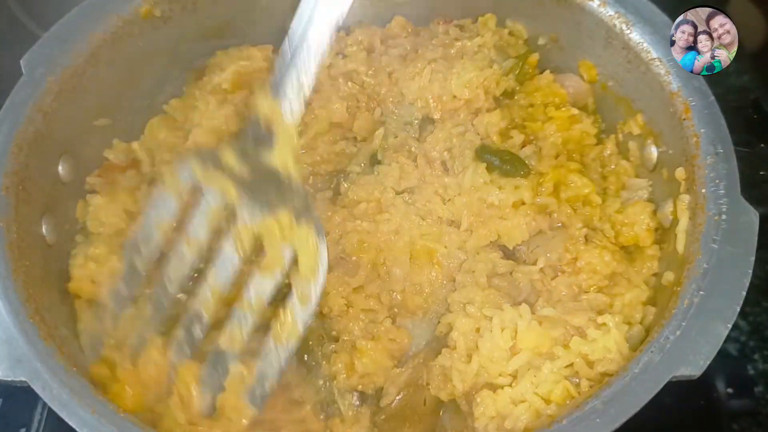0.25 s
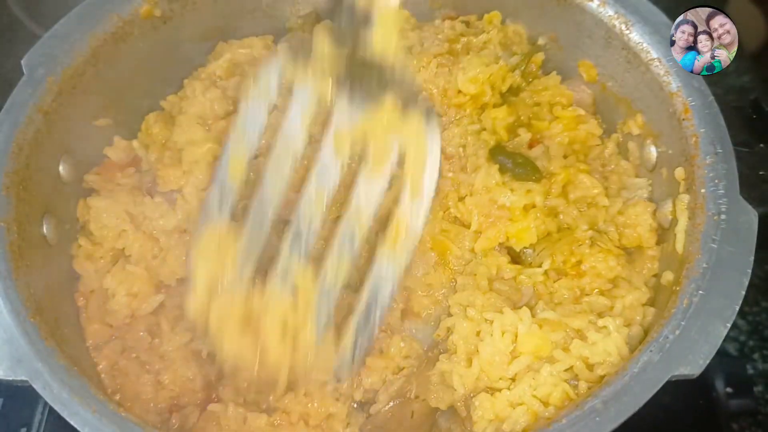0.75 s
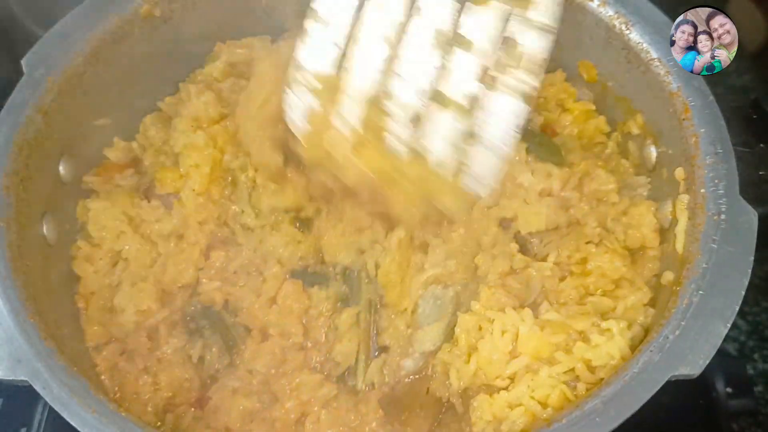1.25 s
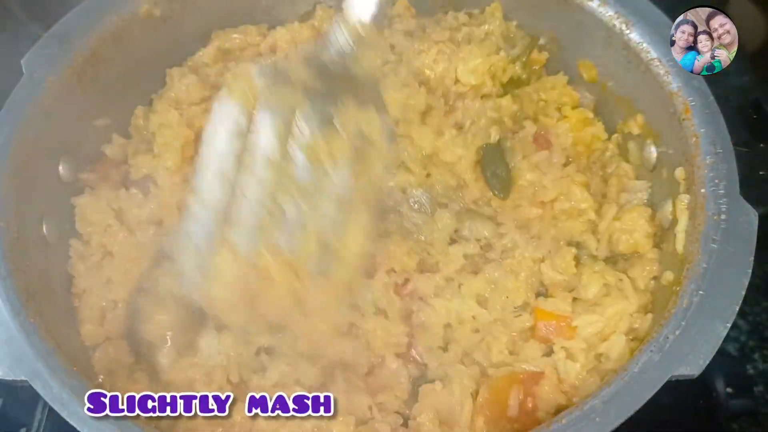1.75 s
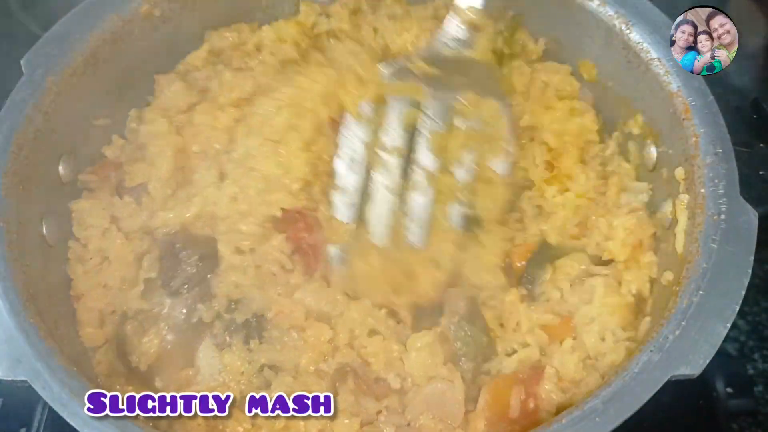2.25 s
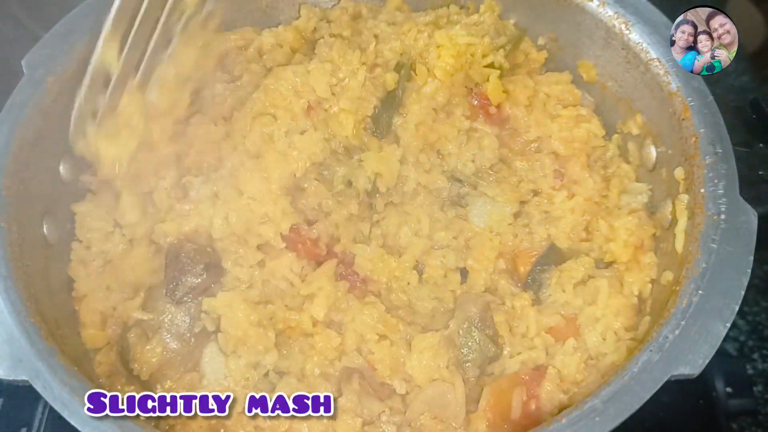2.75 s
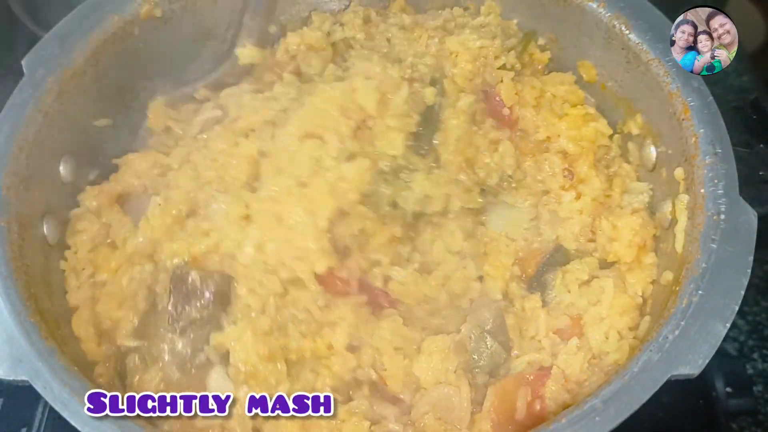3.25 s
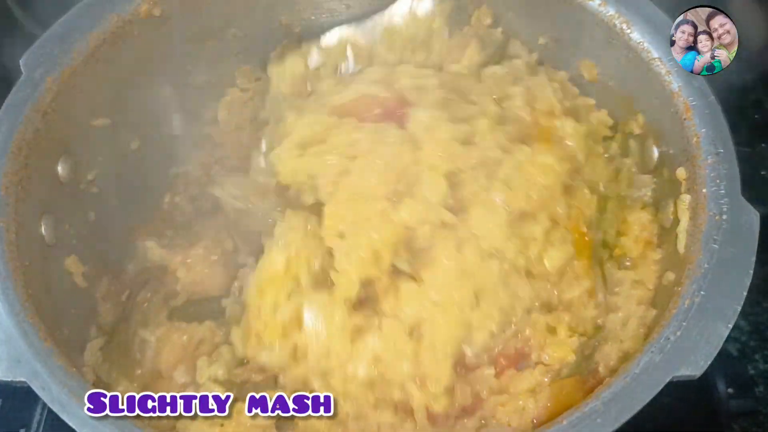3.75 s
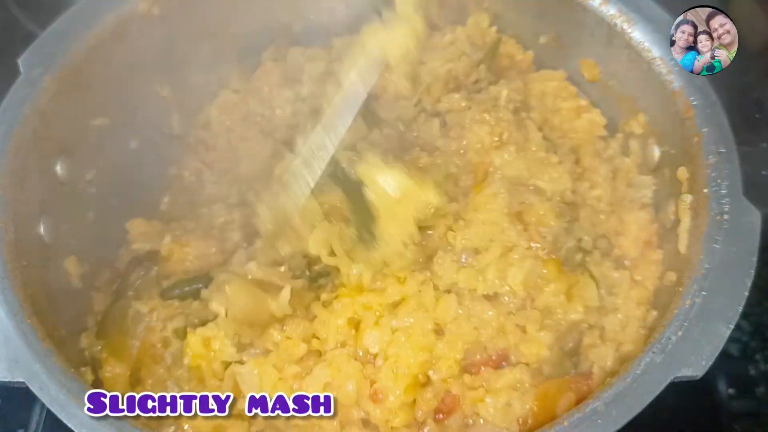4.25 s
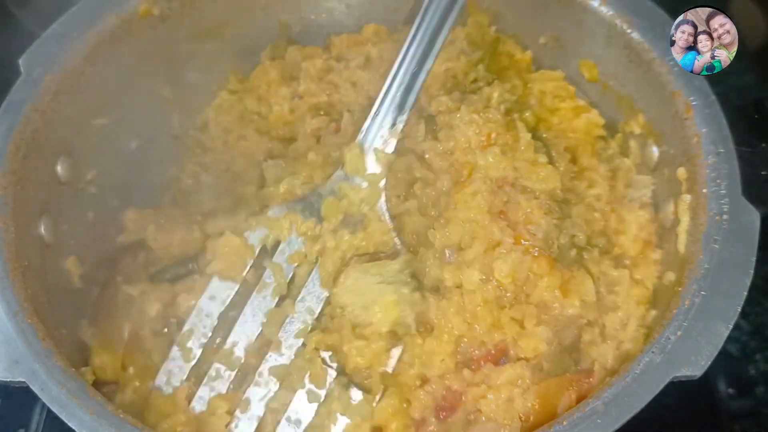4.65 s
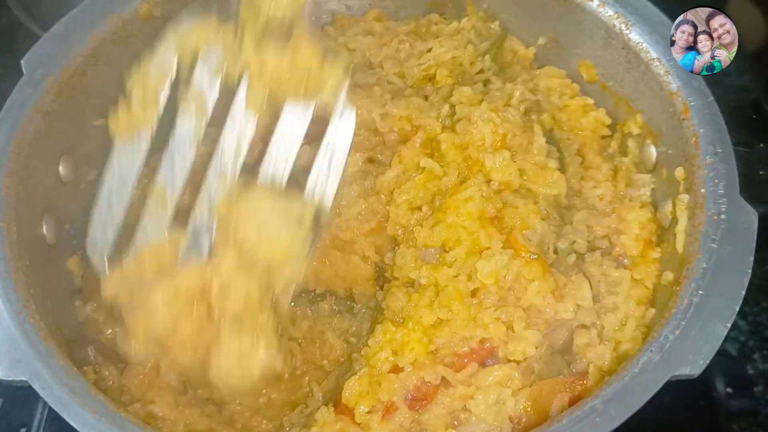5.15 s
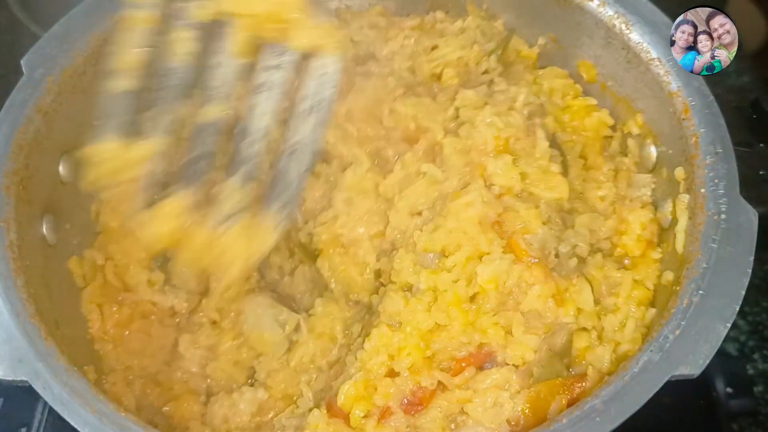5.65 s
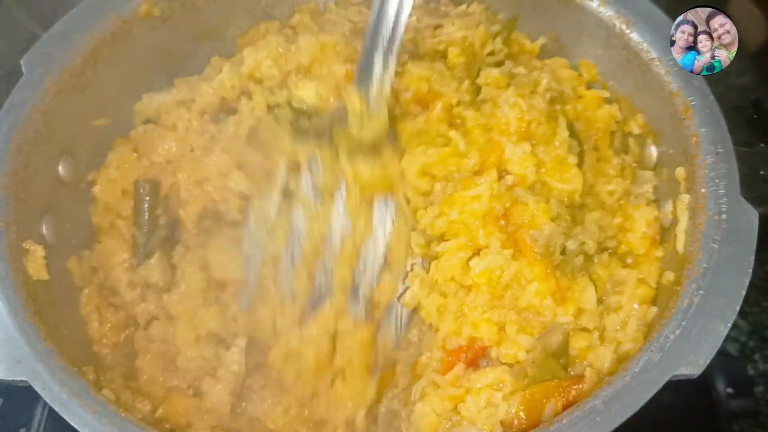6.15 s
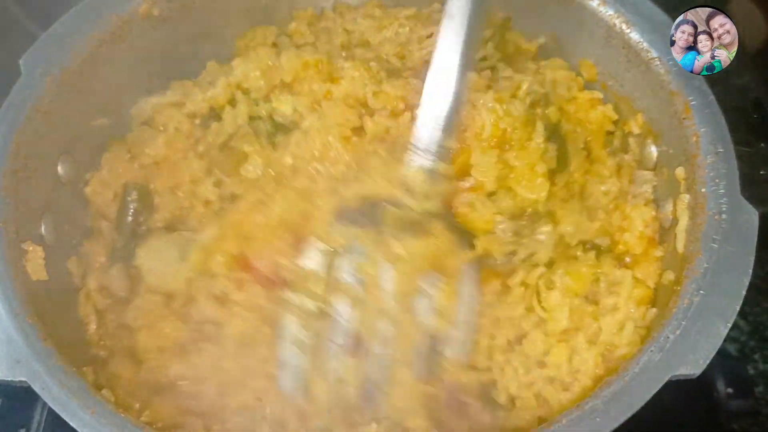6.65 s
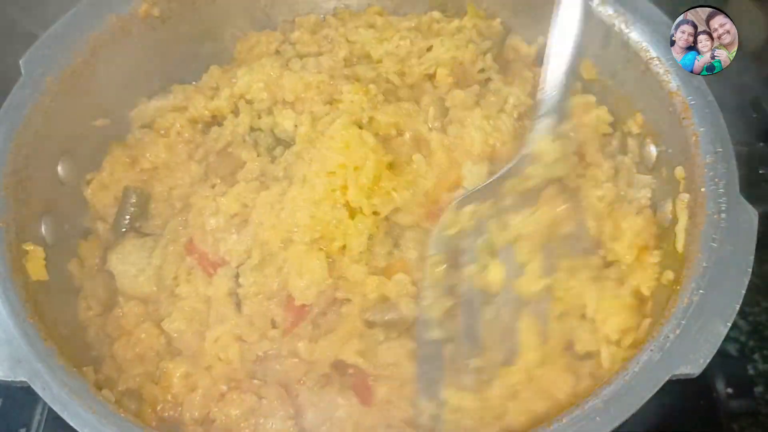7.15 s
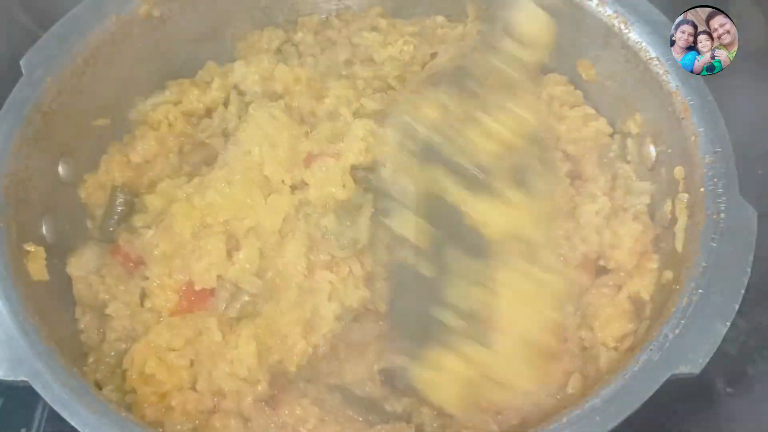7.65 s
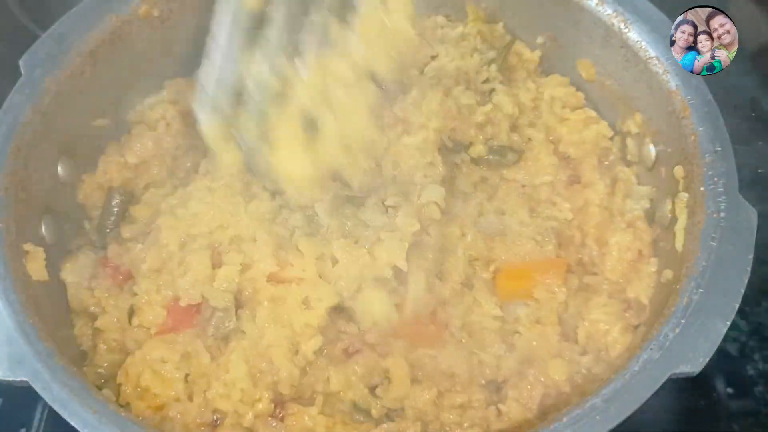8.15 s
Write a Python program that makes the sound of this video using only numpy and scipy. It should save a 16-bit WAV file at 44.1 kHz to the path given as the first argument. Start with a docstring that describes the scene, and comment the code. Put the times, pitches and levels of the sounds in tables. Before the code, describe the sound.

Close, moist crackles and tiny sticky pops as soft rice is mashed, broken by ringing metal knocks and a short juddering scrape on the pot.

```python
"""A hard-walled kitchen: a slotted steel turner mashes soft, wet rice in an aluminium pressure cooker, close by.
Each stroke crackles as sticky films part, made of random clicks, with decaying tones for bubbles.
The blade's knocks are noise bursts plus the pot's ringing modes; its scrape is uneven slips and grit.
Squeaks and short rings are gliding tones. A wavering low hum, low pot resonances, a deep rumble and
a faint hiss are filtered noise."""
import sys
import numpy as np
from scipy import signal
from scipy.fft import rfft, irfft, next_fast_len
from scipy.io import wavfile
from scipy.ndimage import uniform_filter1d, map_coordinates

SR = 44100
rng = np.random.default_rng(int(sys.argv[2]) if len(sys.argv) > 2 else 0)


def dump(signal):
    """Clip the signal to [-1, 1] and save it as 16-bit WAV at the path in sys.argv[1]."""
    limited = np.clip(np.atleast_2d(signal).T, -1, 1)
    pcm = np.round(limited * 32767).astype(np.int16)
    wavfile.write(sys.argv[1], SR, pcm)


N = 370572

# Table levels are starting points: the functions add their own gains.
# Pushes of the blade through the rice: start_s, length_s, crackle_db, squelch_db, thud_db
STROKES = [(0.415, .1, -56.5, -60, -63), (0.556, 0.065, -62, -67, -72.5), (0.825, 0.15, -68, -79.5, -82),
           (0.983, 0.081, -62, -67, -77), (1.1, 0.053, -58, -71, -73), (1.37, 0.091, -72.5, -71, -92),
           (1.46, .08, -68, -74, -88), (1.528, .15, -59, -61, -65.5), (1.715, 0.033, -59, -57, -61.5),
           (1.787, 0.065, -54, -60.5, -60.5), (2.088, 0.12, -60, -62.5, -72),
           (2.256, 0.21, -62, -67.5, -68), (2.596, 0.22, -86.5, -97.5, -89),
           (3.453, 0.12, -57.5, -64, -56.5), (3.597, 0.14, -62.5, -67, -78),
           (3.829, 0.073, -58.5, -63.5, -62.5), (3.935, 0.083, -67, -75, -73),
           (4.208, 0.054, -63.5, -66.5, -65), (4.677, .13, -55.5, -60, -71),
           (4.872, .08, -52, -59.5, -63.5), (5.02, 0.2, -74, -70.5, -69), (5.297, 0.051, -52, -66, -81),
           (5.407, 0.17, -63.5, -70.5, -70.5), (5.949, 0.11, -57.5, -63, -61),
           (6.132, 0.086, -56, -75.5, -70), (6.413, 0.11, -62.5, -66, -63),
           (6.549, 0.12, -56.5, -60, -58.5), (6.744, 0.059, -53, -66, -62), (7.069, .16, -63, -68.5, -65.5),
           (7.304, 0.1, -57.5, -71, -68), (7.419, 0.086, -64, -73, -65.5), (7.717, .19, -66, -70, -65),
           (7.918, 0.089, -55.5, -63.5, -59.5), (8.348, .05, -65, -74, -64)]
# The mash settling between pushes: crackle_db, squelch_db, thud_db
RESTING_DB = (-86, -81.5, -71.5)
# Tone colour of the wet rice: freq_hz, level_db (per Hz)
WET_COLOUR = [(88, -31.5), (150, -4.5), (205, -1.5), (240, -10.5), (328, -2), (368, -10.5), (589, -11),
              (649, -13.5), (1690, -17.5), (3040, -11.5), (5910, -13), (7620, -4.5), (11700, -17.5),
              (14800, -11.5), (16000, -17.5)]
# Larger wet films snapping: start_s, level_db, pitch_hz
FILM_POPS = [(0.554, -37.5, 7940), (.5904, -43, 7800), (0.6077, -37, 6000), (0.6134, -32.5, 7600),
             (0.9416, -40.5, 7900), (1.046, -38, 7600), (1.122, -41, 7600), (1.156, -37.5, 2500),
             (1.1726, -36, 7800), (1.3905, -42.5, 5450), (1.5215, -43.5, 7500), (1.536, -39, 3500),
             (1.5687, -32.5, 7600), (1.6557, -40.5, 7500), (1.7775, -36, 7900), (1.799, -38, 7500),
             (1.8204, -30.5, 7360), (1.8713, -33, 7500), (2.1128, -39.5, 3540), (2.1527, -40, 7640),
             (2.171, -40, 7600), (2.2048, -41, 7600), (2.359, -46, 7550), (2.5661, -42.5, 3420),
             (2.8192, -40.5, 7240), (3.4832, -28.5, 7650), (3.5147, -32.5, 5900), (3.557, -31.5, 11000),
             (3.619, -32, 9540), (3.6573, -37, 7600), (4.0915, -36.5, 7800), (4.2475, -39, 6000),
             (4.286, -46.5, 9000), (4.708, -29, 8070), (4.924, -33.5, 7500), (4.9457, -35, 9000),
             (4.9664, -28, 7670), (5.0128, -35.5, 7900), (5.164, -42, 3400), (5.194, -40, 1110),
             (5.3425, -26, 7800), (5.356, -25, 7500), (5.5523, -34, 7500), (5.64, -38.5, 2500),
             (5.823, -48, 7600), (5.9789, -43, 7600), (6.028, -44, 7600), (6.054, -37.5, 4230),
             (6.163, -37, 8500), (6.1926, -33.5, 7900), (6.5701, -38, 7650), (6.7058, -50, 7600),
             (6.7913, -40, 7700), (6.835, -34.5, 7700), (7.0883, -41, 6900), (7.1138, -40, 8040),
             (7.233, -50, 7600), (7.36, -35.5, 7850), (7.734, -45, 4530), (7.8144, -40, 6600),
             (7.9687, -41, 7500), (7.973, -58, 1810)]
# How far the mash is ahead on the left side: freq_hz, lead_radians
LEFT_LEAD = [(100, 0.04), (950, 1.4), (1800, 1.2), (3000, 1.2), (5800, 0.12)]
# Blade hitting pot: start_s, landing (a name), clank_db, body_db, treble_db, rattle_db, lowest_hz,
# pot_db, blade_hz, blade_db, left_over_right_db
POT_KNOCKS = [(0.1838, "edge", -20, -40, -24, -6, 150, -43, 3580, 4, 2),
              (.481, "tip", -49.5, -53.5, -61, -18, 405, -76, 3000, 0.5, 4),
              (2.883, "edge", -46, -66, -49.5, -9, 400, -70, 3760, 17.5, -4),
              (2.911, "edge", -48, -69.5, -42.5, -11, 400, -67, 3800, 5.5, -4),
              (3.052, "tip", -27.5, -30.5, -39, -16.5, 130, -59, 2280, 0, 0),
              (3.649, "flat", -47, -56.5, -47, -19.5, 204, -76, 2240, 7, -9.5),
              (4.592, "flat", -22.5, -36, -28, -7, 295, -44, 2080, 3.5, 0.5),
              (5.2506, "tip", -28, -42, -35, -9, 168, -45, 3460, 7.5, -1),
              (6.193, "tip", -46.5, -56.5, -49, -20, 500, -75, 2500, -6, -1),
              (6.807, "flat", -45, -49.5, -46, -24.5, 250, -69.5, 1400, -2.5, 1),
              (7.288, "tip", -44.5, -53, -55, -12.5, 484, -74, 3000, 11.5, -1)]
# Ways the blade can land: name
LANDING_NAMES = ["edge", "flat", "tip"]
# First instant of contact over the crack, one for each landing: level_db
LANDING_SNAP = [13, 6, 6]
# The pot's ringing modes and how each landing stirs them: pitch_hz, t60_s, edge_db, flat_db, tip_db
POT_MODES = [(308, .34, -16.5, -22, -7), (343, 0.21, -10.5, -1, -7.5), (391, 0.38, -5.5, -7, -10),
             (434, 0.5, -11.5, -3, -20), (511, .32, -12.5, -2, -0.5), (595, .33, -13, -1, -24),
             (643, .3, -13, -11, -17), (756, 0.28, -6.5, 3.5, -13), (810, .3, -10.5, -13, -5),
             (1010, 0.3, -17, -14, -0.5), (1093, .3, -6.5, -13, -16), (1428, 0.23, -16.5, 0, -9),
             (1590, 0.25, -5, -4, -21), (1770, 0.36, -6.5, -6, -21), (2040, 0.36, 0, -15, -25),
             (2280, 0.27, -4, 1, -17.5), (2545, .35, -0.5, -3, -12), (2850, 0.45, -0.5, -5, -18),
             (3125, .32, -0.5, -15, -12), (3400, 0.12, -4.5, -13.5, 2), (3736, .2, 2.5, -9.5, -15),
             (4080, 0.21, -5, -5, -16), (4640, .25, -0.5, 0, -4.5), (7330, .2, 2, -7, -13.5),
             (7900, .2, 2, -3, -13)]
# Tone colour of a knock: freq_hz, level_db (per Hz)
CLANK_COLOUR = [(120, -15.5), (200, -6), (330, -4), (500, -5.5), (800, -6), (1200, -8), (1500, -8),
                (1900, -4), (2400, -3), (3100, -4.5), (4500, -4), (5500, -4.5), (7700, -1), (9300, -9.5),
                (14400, -21.5), (16000, -25)]
# The blade pressed along the wall: time_s, judder_db, grit_db
SCRAPE_LEVEL = [(3.07, -37, -52), (3.11, -33.5, -38), (3.145, -36.5, -43.5), (3.245, -32.5, -37),
                (3.314, -31.5, -39), (3.388, -35.5, -38.5), (3.47, -52.5, -51.5)]
# Resonances of the pot wall: centre_hz, width_hz, level_db
WALL_MODES = [(509, 24, 6), (570, 59, 7), (650, 34, -2.5), (805, 59, 1.5), (990, 50, 1.5), (1146, 63, 2),
              (1320, 70, -9), (1650, 38, -11), (2150, 140, -19), (2600, 200, -5)]
# Tone colour of the grinding blade: freq_hz, level_db (per Hz)
GRIND_COLOUR = [(71, -48.5), (120, -16), (250, -20), (330, -12.5), (503, -6.5), (698, -7.5), (805, -4.5),
                (892, -10), (1200, -14.5), (1620, -9), (1850, -16.5), (2450, -13.5), (2990, -21),
                (5200, -21), (6500, -23), (7660, -17.5), (11100, -37), (14700, -30.5), (16000, -44)]
# The blade catching and jumping on the wall: start_s, level_db, ring_hz
BLADE_CATCHES = [(3.095, -33, 1027), (3.116, -28, 1000), (3.167, -34, 800), (3.189, -36.5, 830),
                 (3.209, -38, 806), (3.24, -33, 800), (3.267, -32, 806), (3.344, -42.5, 1140),
                 (3.389, -42.5, 650)]
# The edge skidding lightly on metal: start_s, length_s, level_db
EDGE_SKIDS = [(0.206, 0.025, -38.5), (2.881, 0.075, -44.5), (2.968, 0.055, -55.5), (5.199, 0.068, -50.5)]
# Tone colour of the skidding edge: freq_hz, level_db (per Hz)
EDGE_COLOUR = [(300, -10), (725, -13), (1500, -14), (2100, -7.5), (2900, -7), (3800, -2.5), (4500, -0.5),
               (5800, -10), (7500, -2), (9240, -10), (14200, -19), (16000, -25)]
# The edge catching into a tone; the rows near 335 Hz are the pot's hollow ring under strokes,
# and the row at 5.248 s is the blade's resonance ringing at a knock:
# start_s, length_s, first_hz, last_hz, level_db, roughness (no unit, 0 is smooth), side_tones_db
SQUEAKS_AND_RINGS = [(1.004, 0.19, 3150, 2970, -68, 1, -27), (1.205, 0.13, 2010, 2070, -73.5, 0.96, -22),
                     (1.446, 0.055, 2090, 2070, -73, 0.75, -17), (1.658, 0.22, 2030, 2070, -72, 0.63, -16),
                     (1.73, 0.13, 333, 332, -63, 0.27, -30), (2.17, 0.19, 344.5, 322.7, -62, 0.25, -30),
                     (3.096, 0.073, 1001, 1003, -37, 0.65, -22), (3.16, 0.11, 816, 790, -36, 0.7, -29),
                     (4.993, .04, 1896, 1794, -64, 1.43, -6), (5.038, 0.049, 1790, 1980, -66.5, 1.16, -9),
                     (5.078, 0.0089, 2050, 1950, -58, .4, -16), (5.103, 0.072, 1950, 2250, -67, 1.25, -6),
                     (5.188, .012, 4000, 4050, -53, 0.66, -23), (5.199, 0.028, 3660, 4000, -45, 0.3, -26),
                     (5.248, 0.0143, 3597, 3350, -37.5, 0.27, -26)]
# Quieter tones beside each squeak or ring: ratio (to the pitch, no unit), level_db
SIDE_TONE_RATIOS = [(0.459, -3), (1.498, 2.5), (2.0, -7)]
# Low hum: centre_hz, width_hz, level_db
HUM_BANDS = [(67.3, 1.4, -4.5), (92.4, 16, -9)]
# Wavering level of the low hum: time_s, level_db
HUM_LEVEL = [(0, -73), (.4, -63.5), (.75, -75.5), (1.75, -67.5), (2.1, -74.5), (3.3, -63), (4.3, -69.5),
             (5.4, -62), (5.8, -67.5), (6.4, -62.5), (7.1, -67.5), (8.4, -69)]
# Low resonances of the pot: centre_hz, width_hz, level_db
POT_LOW_BANDS = [(140.8, 7, 3.5), (205.5, 20, -8.5), (287.7, 9.6, -13.5), (337.3, 7.2, -12)]
# Wavering level of the pot's low resonances: time_s, level_db
POT_LOW_SWELL = [(0, -86.5), (.25, -59), (.8, -72.5), (1.8, -69.5), (4.4, -71), (5.3, -65.5), (5.8, -72.5),
                 (8.05, -62), (8.4, -68)]
# Swells of deep rumble: start_s, length_s, level_db
RUMBLE_SWELLS = [(4.593, 0.92, -59), (7.198, 0.42, -68)]
# Tone colour of the hiss: freq_hz, level_db (per Hz)
AIR_COLOUR = [(12, -31), (20, 3.5), (48, -0.5), (81, -11), (142, -10.5), (248, -23), (328, -16.5),
              (388, -18.5), (1150, -27), (3250, -28.5), (5680, -35), (7730, -32), (11400, -34),
              (14700, -32.5), (16000, -46.5)]
# How long the room rings: freq_hz, t60_s
KITCHEN_DECAY = [(150, 0.78), (600, 0.39), (3000, 0.43), (8000, 0.22), (15000, 0.58)]
# Stereo width of the reflections: freq_hz, side_over_mid (ratio, no unit)
REFLECTION_WIDTH = [(150, 0.33), (500, 0.76), (1000, 1.4), (4500, 1.6), (6000, 0.82), (15000, 0.68)]
# Balance of the two sides: freq_hz, right_over_left_db
RIGHT_LEAN = [(200, 0), (400, 3.5), (700, -1.5), (1300, 1), (4000, 1), (8000, 2), (13000, 5)]

# "T60" is the time to fall by 60 dB.
TOP_HZ = 16000  # nothing is kept above this
# bite into the rice, growing pressure, let-go
STROKE_ATTACK_S, STROKE_SWELL_DB, STROKE_RELEASE_DB_PER_S = 0.038, 1, 218
BUBBLES_PER_S, BUBBLE_DB = 110, 9  # level over the crackle, before each bubble's random extra
# middle pitch, its scatter, cycles to fall by 60 dB
BUBBLE_HZ, BUBBLE_OCTAVES, BUBBLE_CYCLES = 7700, 0.461, 12.4
SPATTER_T60_S, CATCH_T60_S, CATCH_WIDTH_HZ = 0.04, 0.08, 91
BLADE_OCTAVES = 0.29  # width of the blade resonance
MODE_DRIFT_RADIANS = 0.41  # slow phase wander of the ringing pot
# touch, growing pressure, lift-off
SKID_ATTACK_S, SKID_SWELL_DB, SKID_RELEASE_DB_PER_S = 0.0069, 7.5, 399.5
# quick start and even fall of each tone; flutter is for roughness 1
SQUEAK_ATTACK_S, SQUEAK_RELEASE_DB_PER_S, SQUEAK_FLUTTER_DB = 0.0047, 445, 2.5
BOOM_DB = -27.5  # the pot's low resonances, relative to the judder of the scrape
RUMBLE_ATTACK_S, RUMBLE_RELEASE_DB_PER_S = 0.1, 74


def effort():
    """Gain curves of crackle, squelch and thud as the blade pushes through the rice."""
    out = np.ones((3, N)) * amp(RESTING_DB)[:, None]
    for s, length, *layers_db in STROKES:
        push = gesture(s, length, STROKE_ATTACK_S, STROKE_RELEASE_DB_PER_S, STROKE_SWELL_DB)
        out += amp(layers_db)[:, None] * push
    return out


def rice(crackle, squelch, thud, crackle_db=-4.0, squelch_db=-4.5, thud_db=-8.0, density=560):
    """Sticky films part in tiny clicks, denser in a hard stroke; pockets in the mash answer lower."""
    rate = density * (0.12 + unit(crackle))
    films = grains(rate * amp(4 * wobble(70)), spread_db=2.5)
    pockets = unit(films + grains(rate, spread_db=4.5))
    lumps = grains(3 * rate, spread_db=1.0)

    def wet(x, lo_hz, hi_hz):
        """One band of clicks in the colour of wet rice."""
        return unit(filtered(x, lambda f: causal(amp(along(WET_COLOUR, f)) * band(f, lo_hz, hi_hz))))

    high = amp(crackle_db) * crackle * wet(films, 3800, 23000)
    middle = amp(squelch_db) * squelch * wet(pockets, 1000, 4380)
    low = amp(thud_db) * thud * wet(lumps, 240, 950)
    return high + middle + low


def bubbles(crackle, count=1600):
    """Tiny bubbles burst at random, each a decaying tone at its own pitch, louder around each stroke."""
    out, t = np.zeros(N), np.arange(SR // 100) / SR
    near = np.abs(uniform_filter1d(crackle, size=6000))
    gaps, sizes = rng.exponential(size=count), rng.exponential(size=count)
    pitches = rng.standard_normal(count)
    starts = np.cumsum(gaps) / BUBBLES_PER_S
    for s, size, pitch in zip(starts, np.minimum(sizes, 3), pitches):
        if s < (N - 1) / SR:
            hz = min(BUBBLE_HZ * 2 ** (BUBBLE_OCTAVES * pitch), TOP_HZ)
            fade = amp(BUBBLE_DB + 3.04 * size - 60 * hz * t / BUBBLE_CYCLES)
            add(out, s, near[int(s * SR)] * fade * np.sin(2 * np.pi * hz * t))
    return out


def pops(gain_db=5, linger_db=-8, ring_db=4, ring_octaves=0.11):
    """A larger film breaks in one sharp tick that rings at its own pitch, with a little spatter after it."""
    out, t = np.zeros(N), np.arange(SR // 20) / SR
    for s, db, hz in FILM_POPS:
        spatter = rng.standard_normal(len(t)) * amp(-60 * t / SPATTER_T60_S)
        snap = (t == 0) + amp(linger_db) * spatter / np.linalg.norm(spatter)

        def response(f):
            colour = amp(along(WET_COLOUR, f) + ring_db * bump(f, hz, ring_octaves))
            return causal(colour * band(f, hz / 2.2, hz * 1.2, order=2))

        tick = filtered(snap, response)
        add(out, s, amp(db + gain_db) * tick / np.linalg.norm(tick))
    return out


def knocks(attack_s=0.00083, gain_db=-10, body_db=7, treble_db=8, crack_t60=0.044, rattle_t60=0.49,
           boom_db=2, chatter_db=2.5):
    """A hard crack, a short rattle of the blade, and the pot's modes, mixed by how the blade lands."""
    out, t = np.zeros((2, N)), np.arange(SR * 3 // 4) / SR

    def jitter(size):
        """A random curve with a new value every size samples."""
        return np.interp(t, t[::size], rng.standard_normal(len(t[::size])))

    for (s, landing, db, low_db, high_db, rattle_db, lowest_hz,
         pot_db, blade_hz, blade_db, pan_db) in POT_KNOCKS:
        which = LANDING_NAMES.index(landing)

        def coloured(x, lo_hz, hi_hz, order=4):
            """One band of the clank, with the blade's own resonance added."""
            def response(f):
                colour = amp(along(CLANK_COLOUR, f) + blade_db * bump(f, blade_hz, BLADE_OCTAVES))
                return causal(unit(colour * band(f, lo_hz, hi_hz, order)))
            return filtered(x, response)

        fall = amp(-60 * t / crack_t60) + amp(LANDING_SNAP[which] - 60 * t / 0.0054)
        crack = rng.standard_normal(len(t)) * fall
        chatter = unit(amp(chatter_db * jitter(size=128)))
        rattle = rng.standard_normal(len(t)) * chatter * amp(rattle_db - 60 * t / rattle_t60)
        body = amp(low_db + body_db) * coloured(crack + amp(boom_db) * rattle, lowest_hz, 1300, order=7)
        clank = amp(db) * coloured(crack + rattle, 1300, 5520)
        treble = amp(high_db + treble_db) * coloured(crack + rattle, 5000, 17000)
        ring = np.zeros(len(t))
        for hz, t60, *shares_db in POT_MODES:
            phase = 2 * np.pi * (hz * t + rng.random()) + MODE_DRIFT_RADIANS * jitter(size=700)
            ring += amp(pot_db + shares_db[which] - 60 * t / t60) * np.sin(phase)
        hit = np.minimum(t / attack_s, 1) * (amp(gain_db) * (body + clank + treble) + ring)
        add(out, s, panned(hit, pan_db))
    return out


def scrape(wall_db=-10, grind_db=-7, grit_db=-4, slip_rate=95):
    """The blade sticks and slips unevenly along the wall and shakes its resonances; grit rasps above."""
    turns = np.cumsum(slip_rate * amp(4 * wobble(90))) / SR
    # one click each time the running count passes a whole number
    slips = unit(np.diff(np.floor(turns), prepend=0) * amp(4.0 * wobble(120)))

    def rub(share):
        """Slips mixed with fine grit."""
        return unit(share * slips + grains(3000, spread_db=2.5) * amp(0.81 * wobble(80)))

    def grind(lo_hz, hi_hz):
        """One band of the grinding sound."""
        return unit(filtered(rub(0.32), lambda f: causal(amp(along(GRIND_COLOUR, f)) * band(f, lo_hz, hi_hz))))

    wall = unit(filtered(rub(0.98), lambda f: resonances(WALL_MODES, f) * band(f, 380, 2600)))
    judder = amp(wall_db) * wall + amp(grind_db) * grind(162, 1590)
    grit = amp(grit_db) * grind(1570, 17000)
    return level(SCRAPE_LEVEL) * judder + level(SCRAPE_LEVEL, axis=2) * grit


def catches(gain_db=1, crunch_db=-2):
    """Each jump of the blade is a short rough burst that rings the wall at one pitch."""
    out, t = np.zeros(N), np.arange(SR // 6) / SR
    for s, db, hz in BLADE_CATCHES:
        burst = rng.standard_normal(len(t)) * amp(-60 * t / CATCH_T60_S)

        def response(f):
            crunch = amp(crunch_db + along(GRIND_COLOUR, f)) * band(f, 200, 2300)
            ring = np.abs(resonances([(hz, CATCH_WIDTH_HZ, 6)], f))
            return causal(unit((crunch + ring) * band(f, 97, 3200)))

        add(out, s, amp(db + gain_db) * filtered(burst, response))
    return out


def squeaks_and_rings(gain_db=-2.5):
    """Friction tones that glide and waver, and short rings of the pot and the blade, with side tones."""
    out = np.zeros(N)
    waver = 0.04 * wobble(330) + 0.06 * wobble(1300)
    flutter = SQUEAK_FLUTTER_DB * wobble(220)
    for s, length, first_hz, last_hz, db, rough, sides_db in SQUEAKS_AND_RINGS:
        grip = amp(db) * gesture(s, length, SQUEAK_ATTACK_S, SQUEAK_RELEASE_DB_PER_S)
        grip *= amp(rough * flutter)
        on = grip > 0
        glide = np.interp(clock()[on], [s, s + length], [first_hz, last_hz])
        phase = 2 * np.pi * np.cumsum(glide * (1 + rough * waver[on])) / SR
        sides = sum(amp(sides_db + tone_db) * np.sin(ratio * phase) for ratio, tone_db in SIDE_TONE_RATIOS)
        out[on] += grip[on] * (np.sin(phase) + sides)
    return amp(gain_db) * out


def skids(gain_db=0):
    """Light contact gives a fine, bright rasp that grows until the edge lifts."""
    def response(f):
        return causal(amp(along(EDGE_COLOUR, f)) * band(f, 530, 18000, order=1))
    rasp = unit(filtered(grains(5000, spread_db=4.5), response))
    contact = np.zeros(N)
    for s, length, db in EDGE_SKIDS:
        contact += amp(db) * gesture(s, length, SKID_ATTACK_S, SKID_RELEASE_DB_PER_S, SKID_SWELL_DB)
    return amp(gain_db) * rasp * contact


def kitchen(direct, early_db, tail_db, size=4096):
    """Pot walls answer within milliseconds, redrawn every size samples; the hard room adds a long tail."""
    x = direct.mean(axis=0)
    # the tail is noise whose every pitch dies at its own speed
    hz, t, z = signal.stft(rng.standard_normal((2, SR * 3 // 4)), SR, nperseg=256)
    fall = amp(-60 * t / along(KITCHEN_DECAY, hz)[:, None]) * (1 - np.exp(-t / 0.005))
    tail = signal.istft(z * fall, SR, nperseg=256)[1]
    tail /= np.linalg.norm(tail[0])
    answer = amp(tail_db) * signal.fftconvolve(x[None], tail, axes=1)[:, :N]
    dying = amp(-60 * np.arange(SR // 40) / SR / 0.02)
    for start in range(0, N, size):
        walls = rng.standard_normal((2, len(dying))) * dying / np.linalg.norm(dying)
        early = signal.fftconvolve(x[None, start:start + size], walls, axes=1)
        add(answer, start / SR, amp(early_db) * early)
    return direct + widened(answer)


def background(hum_db=1, pot_low_db=0, rumble_db=-77, air_db=-70.5):
    """A narrow low hum, pot resonances that boom under the scrape, a rumble and a faint even hiss."""
    def noise(response, apart):
        """Filtered stereo noise; apart sets how much the sides differ."""
        mid, side = filtered(rng.standard_normal((2, N)), response)
        return unit(np.array([mid + apart * side, mid - apart * side]))

    hum = noise(lambda f: resonances(HUM_BANDS, f) * band(f, 58, 130), apart=0.2)
    pot_low = noise(lambda f: resonances(POT_LOW_BANDS, f) * band(f, 110, 450), apart=0.25)
    rumble = noise(lambda f: band(f, 14, 27, order=6), apart=0.4)
    air = noise(lambda f: amp(along(AIR_COLOUR, f)) * band(f, 50, 17000), apart=0.5)
    boom = amp(BOOM_DB) * level(SCRAPE_LEVEL)
    humming = amp(hum_db) * level(HUM_LEVEL) * hum
    booming = (amp(pot_low_db) * level(POT_LOW_SWELL) + boom) * pot_low
    swells = np.zeros(N)
    for s, length, db in RUMBLE_SWELLS:
        swells += amp(db) * gesture(s, length, RUMBLE_ATTACK_S, RUMBLE_RELEASE_DB_PER_S)
    return humming + booming + (amp(rumble_db) + swells) * rumble + amp(air_db) * air


def amp(db):
    """Decibels to gain."""
    return 10 ** (np.asarray(db) / 20)


def unit(x):
    """Scale to rms (average strength) 1."""
    return x / np.sqrt(np.mean(x ** 2) + 1e-20)


def along(points, hz):
    """Read a (freq_hz, value) table at any frequency, on a log axis."""
    f, v = np.transpose(points)
    return np.interp(np.log(hz + 1), np.log(f + 1), v)


def clock():
    """The time of each sample, in seconds."""
    return np.arange(N) / SR


def level(rows, axis=1, fade=0.0075):
    """Gain curve from a dB column, fading out beyond its ends."""
    rows, t = np.asarray(rows), clock()
    inside = np.clip(1 + np.minimum(t - rows[0, 0], rows[-1, 0] - t) / fade, 0, 1)
    return amp(np.interp(t, rows[:, 0], rows[:, axis])) * inside


def gesture(s, length, attack_s, release_db_per_s, swell_db=0):
    """Gain of one movement: a quick rise, a hold that swells, then an even fall in dB."""
    out = np.zeros(N)
    t = np.arange(int((length + 0.4) * SR)) / SR
    db = swell_db * (np.minimum(t / length, 1) - 0.5) - release_db_per_s * np.maximum(t - length, 0)
    add(out, s, np.minimum(t / attack_s, 1) * amp(db))
    return out


def wobble(rate):
    """A smooth random curve, rate knots a second."""
    knots = rng.standard_normal(int(N * rate / SR) + 4)
    return map_coordinates(knots, [clock() * rate], order=2)


def grains(rate, spread_db):
    """Random clicks of uneven size, rate a second, at rms 1."""
    size = amp(spread_db * np.minimum(rng.exponential(size=N), 3)) * rng.choice([-1, 1], N)
    return unit((rng.random(N) < rate / SR) * size / np.sqrt(rate))


def filtered(x, response):
    """Filter x with a response given as a function of frequency."""
    n = x.shape[-1]
    m = 2 * next_fast_len(n // 2 + 4096)
    return irfft(rfft(x, m) * response(np.fft.rfftfreq(m, 1 / SR)), m)[..., :n]


def causal(gain):
    """The response with this gain that rings only after its cause."""
    c = irfft(np.log(np.maximum(gain, 1e-6)))
    c[1:len(c) // 2] *= 2
    c[len(c) // 2 + 1:] = 0
    return np.exp(rfft(c))


def band(hz, lo_hz, hi_hz, order=4):
    """Gain of a band with smooth edges."""
    low_edge = 1 + (lo_hz / (hz + 1)) ** (2 * order)
    high_edge = 1 + (hz / hi_hz) ** (2 * order)
    return (low_edge * high_edge) ** -0.5


def bump(hz, centre_hz, octaves):
    """A bell of height 1 on a log-frequency axis."""
    return np.exp(-(np.log2((hz + 1) / centre_hz) / octaves) ** 2)


def resonances(modes, f):
    """Response of (centre_hz, width_hz, level_db) resonances, with alternating signs."""
    total = 0
    for k, (centre, width, db) in enumerate(modes):
        damping = 1j * f * width
        total = total + (-1) ** k * amp(db) * damping / (centre * centre - f * f + damping)
    return total


def panned(x, db):
    """Place a sound between left and right; db is left over right."""
    return x * amp([[db / 2], [-db / 2]])


def widened(pair):
    """Left and right from a middle and a side signal."""
    mid, side = pair[0], filtered(pair[1], lambda f: along(REFLECTION_WIDTH, f))
    return np.array([mid + side, mid - side])


def add(track, s, x):
    """Mix x into the track at time s."""
    part = track[..., round(s * SR):][..., :x.shape[-1]]
    part += x[..., :part.shape[-1]]


def scene():
    """Rice and metal each get their own reflections, stronger for the rice; the high treble leans right."""
    crackle, squelch, thud = effort()
    sides = np.array([[-0.5], [0.5]])
    wet = panned(rice(crackle, squelch, thud) + bubbles(crackle) + pops(), db=-1.0)
    # the mash reaches the left side first
    wet = filtered(wet, lambda f: np.exp(-1j * sides * along(LEFT_LEAD, f)))
    mash = kitchen(wet, early_db=-2.0, tail_db=-6.5)
    rubbing = panned(scrape() + catches() + squeaks_and_rings() + skids(), db=1.7)
    metal = kitchen(rubbing + knocks(), early_db=-3.5, tail_db=-8.5)
    return filtered(mash + metal, lambda f: amp(sides * along(RIGHT_LEAN, f))) + background()


def record(dry):
    """Nothing is kept above the band limit."""
    return filtered(dry, lambda f: f < TOP_HZ)


dry = scene()
out = record(dry)
dump(out)
```